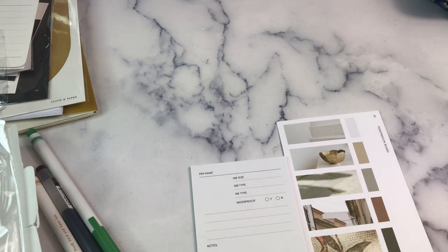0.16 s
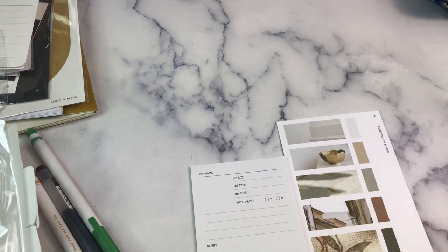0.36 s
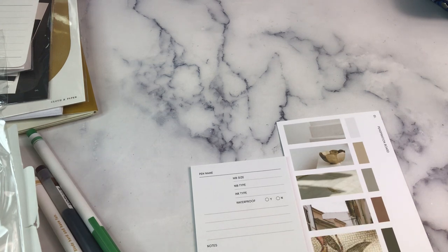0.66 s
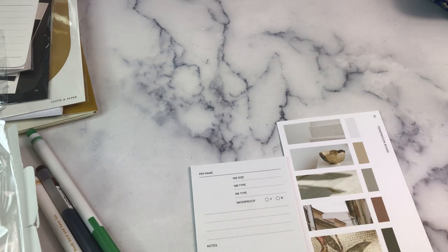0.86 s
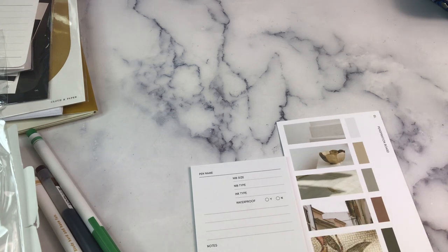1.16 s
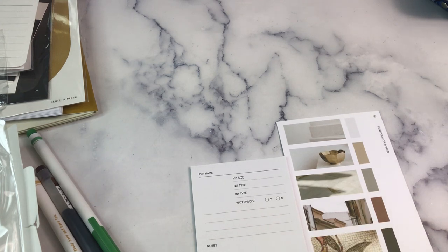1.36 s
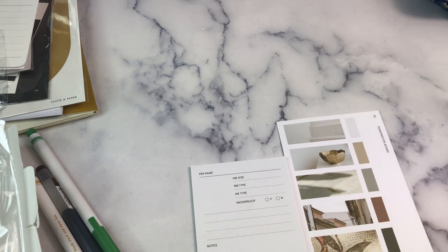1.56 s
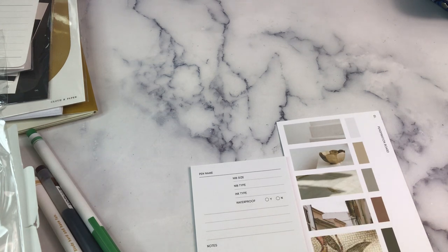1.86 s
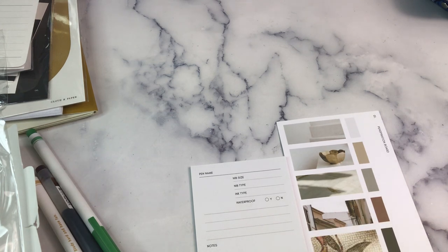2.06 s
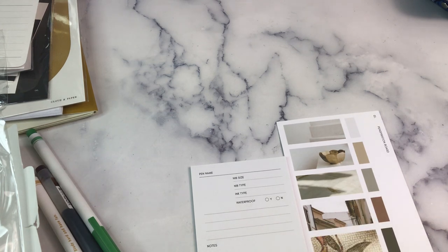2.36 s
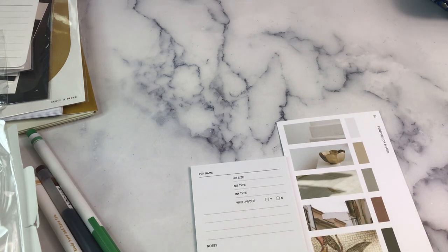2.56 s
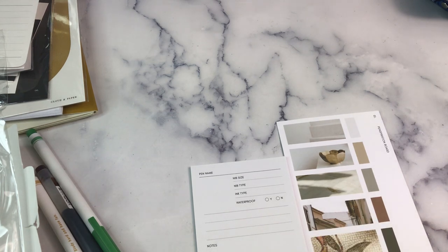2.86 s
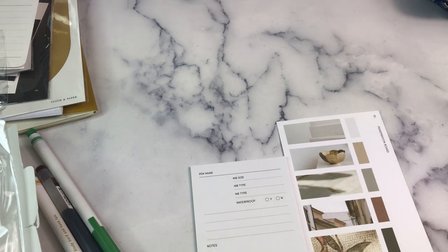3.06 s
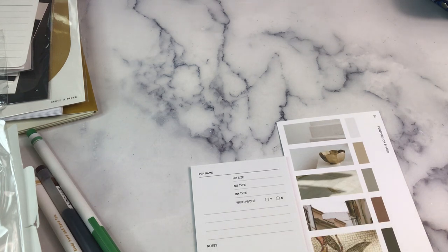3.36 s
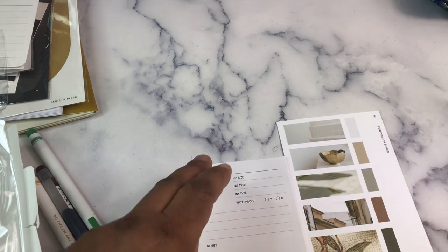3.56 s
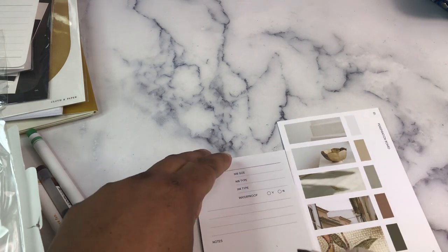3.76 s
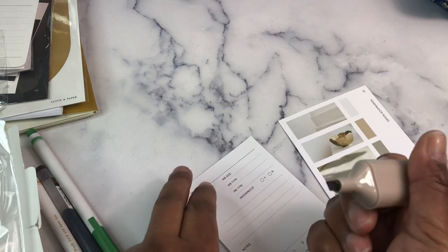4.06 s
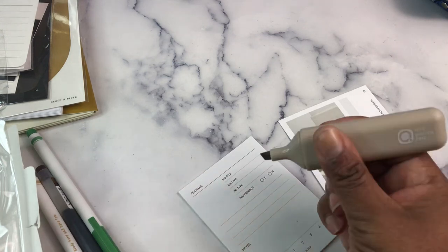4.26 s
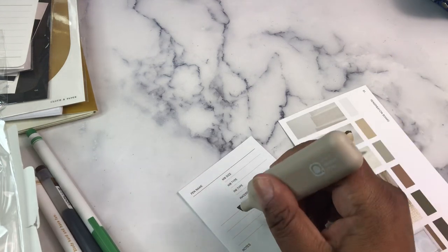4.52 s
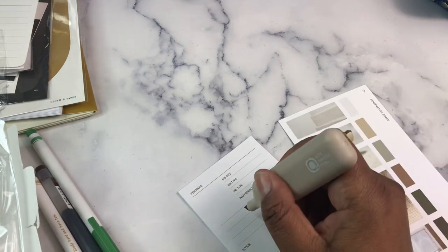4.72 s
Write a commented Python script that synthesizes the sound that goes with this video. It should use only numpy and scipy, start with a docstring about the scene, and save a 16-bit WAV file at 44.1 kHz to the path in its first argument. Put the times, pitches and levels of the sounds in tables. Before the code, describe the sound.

Close, dry sounds of shuffled sheets, small plastic creaks and a single loud cap snap, followed by faint rubbing of skin and paper.

```python
"""Paper slides over a table, made of hiss shaped into strokes, with soft hand bumps ringing table and sheet.
A plastic highlighter is then gripped close to the microphone: as its tight cap is worked loose, it ticks,
creaks and judders, each small slip ringing the plastic. The cap comes off with one sharp snap, a single blow.
Hands then brush across the table and turn a notepad: filtered noise for skin and paper, and one late tick.
Steady noise and short echoes of a small quiet room lie around it all."""
import sys
import numpy as np
from scipy import signal
from scipy.fft import rfft, irfft
from scipy.io import wavfile

SR = 44100
rng = np.random.default_rng(int(sys.argv[2]) if len(sys.argv) > 2 else 0)


def unload_audio(sound):
    """Save the sound as a 16-bit wav file, at the path given as the first command line argument."""
    columns = np.transpose(np.atleast_2d(sound))
    # keep every value between -1 and 1, then stretch to whole-number steps
    steps = np.round(np.clip(columns, -1, 1) * 32767)
    wavfile.write(sys.argv[1], SR, steps.astype(np.int16))


N = 215560
TIME = np.arange(N) / SR  # s

# Levels are relative: the functions add the balance between the parts.
# Each resonance filter is used twice, so its "width" is that of a single pass.

# the moment the cap comes off
SNAP_S = 2.7383
# ring of the freed cap and barrel: f/Hz, width/Hz, level/dB
CAP_RING = [(980, 240, -9), (1140, 130, -6), (1330, 180, -9), (1670, 240, -3), (1770, 130, 0),
            (1965, 110, -7), (2160, 200, -4), (2360, 180, -11), (2710, 280, -9), (3830, 300, -16),
            (4400, 350, -15), (5600, 700, -14), (6100, 600, -14)]
# sharp crack of the snap: f/Hz, width/Hz, level/dB
CRACK = [(1690, 1580, -1.5), (4170, 200, -4.5), (5900, 1200, -6.5), (9730, 2000, -8), (11660, 1400, -10.5),
         (15100, 1100, -17.5)]
# the hands jerk apart as the cap lets go: f/Hz, width/Hz, level/dB
RECOIL = [(84, 55, 0), (121, 90, -4.5), (270, 63, -8.5)]
# colour of the snap's echoes from things nearby: f/Hz, level/dB
SPLASH = [(200, -19), (700, 4), (1800, 6), (3200, -1.5), (6000, -3), (9000, -7), (16000, -15)]

# runs of slips: t/s, length/s, first rate/Hz, last rate/Hz, peak level/dB,
# place of the peak (0-1), extra rim level/dB, rim pitch ratio
CREAKS = [(0.91, 0.036, 229.7, 103, -50.5, 0.33, -8, 0.95),
          (1.029, 0.055, 208.5, 133.6, -50.5, 0.2, 0, 0.95),
          (2.018, 0.018, 230.5, 159, -49, 0.17, -2.5, 1.16),
          (2.2982, .057, 88.5, 354, -38, 0.4, -1.5, 0.67), (2.5479, 0.019, 216, 421, -39, 0.14, 2, 1.04)]
CREAK_FADE_DB = 17  # slips weaken on both sides of the peak: dB over the length of a run
CREAK_DULLING_DB = 1.5  # quick slips load the rim less and sound duller: dB per doubling of the rate
# the twisted cap judders, slowing down
JUDDER_S, JUDDER_LENGTH_S, JUDDER_FIRST_HZ, JUDDER_LAST_HZ = 2.1072, 0.156, 123, 70.4
# single slips of the cap on the barrel: t/s, level/dB, extra rim level/dB
TICKS = [(1.0952, -52.5, -4), (1.144, -54, -4), (1.1654, -54.5, 7), (1.188, -53, -5), (1.3419, -49, -2),
         (1.5304, -61, 11), (1.7368, -51.5, -10), (1.7636, -44, -6), (1.807, -49, -16), (1.8338, -42, -3),
         (1.8594, -58, 4), (1.879, -41.5, 3.5), (1.9193, -46.5, -7), (1.933, -45, -3), (1.9494, -49.5, -7),
         (1.9607, -41.5, 2.5), (2.001, -52, -7), (2.1237, -45.5, -12), (2.1532, -40.5, -11),
         (2.1865, -39, -7), (2.2177, -41.5, -4.5), (2.2387, -39.5, -4.5), (2.2823, -49, -10),
         (2.7071, -50.5, -9.5), (4.431, -48, -18)]
# fingers squeeze the plastic: t/s, length/s, level of the weakest tiny slips/dB
SQUEEZES = [(0.961, 0.15, -66), (1.12, .14, -66.5), (1.481, .27, -65.5), (1.75, .27, -67.5),
            (2.017, 0.11, -75), (2.36, .18, -71.5), (2.68, .055, -64.5)]
# resonances of the highlighter, before any detuning: f/Hz, width/Hz, level/dB
SHELL = [(1700, 650, 8), (2430, 230, -9.5), (2950, 1300, 9.5)]
GRIPPED_SHELL = [(1790, 690, 2), (2250, 1500, 1), (3230, 930, -11.5)]
TWISTED_SHELL = [(850, 620, 1.5), (1600, 450, 5.5), (2770, 690, 3)]
RIM = [(4300, 610, -4), (6500, 1700, 2.5), (7620, 5700, 7.5), (12900, 6800, -4)]
GRIPPED_RIM = [(4600, 960, -7.5), (6690, 1500, 0), (8150, 3500, 0.5), (13500, 10000, -10)]
HOLLOW_BARREL = [(850, 650, 0)]

# paper sliding at a steadily changing speed: t/s, length/s, first level/dB, last level/dB, extra treble level/dB
STROKES = [(0.026, 0.13, -52.5, -42, -4), (0.222, 0.057, -71, -68, -3), (0.403, 0.072, -69.5, -58.5, -3),
           (0.533, 0.062, -62.5, -56.5, -1), (0.637, 0.091, -61.5, -60.5, -1.5),
           (0.752, 0.052, -57.5, -51.5, 1.5), (0.846, 0.11, -66, -69, -5), (1.389, 0.085, -55, -64, -7),
           (3.166, 0.12, -65.5, -62, -1), (3.324, 0.11, -63.5, -58.5, -1.5),
           (3.47, 0.15, -64.5, -66.5, -5.5), (3.802, 0.18, -69.5, -64, -1),
           (4.159, 0.041, -62.5, -61.5, 1.5), (4.228, .14, -72.5, -69.5, -5.5)]
# colour of the paper hiss: f/Hz, level/dB
PAPER = [(200, -51), (600, -29), (900, -10), (1400, -16.5), (2400, -6.5), (3300, 0.5), (4400, 5),
         (6500, 2.5), (8000, -1), (11000, -8), (14000, -5), (16000, -22)]
# fingertips dragging on paper: t/s, length/s, f/Hz, level/dB
DRAGS = [(0.565, 0.022, 2060, -62), (1.39, 0.027, 3900, -55.5), (3.178, 0.032, 4140, -61),
         (3.273, 0.045, 3200, -59), (3.318, 0.017, 4100, -56), (3.45, 0.12, 4650, -65)]
# skin rubbing over pad and barrel: t/s, length/s, rub level/dB, level of the hand's rumbling weight/dB
RUBS = [(.01, 0.21, -70.5, -78), (0.24, 0.71, -82.5, -76.5), (1.195, 0.234, -87, -70.5),
        (1.625, 0.11, -79, -77), (3.282, 0.6, -71, -70.5), (3.843, 0.076, -66.5, -64),
        (3.935, 0.46, -71, -75), (4.444, 0.407, -73, -68.5)]
# colour of rubbing skin: f/Hz, level/dB
SKIN = [(40, -14.5), (120, -0.5), (280, 6.5), (600, -5), (1400, 0), (2400, 0), (4200, -0.5), (7000, -8),
        (15000, -17)]
# a hand slides on the bare table top: t/s, length/s, level/dB
SLIDES = [(.01, 0.078, -66), (3.326, 0.43, -75.5), (3.805, 1.0, -90)]
# resonances of the table top: f/Hz, width/Hz, level/dB
TABLE_TOP = [(1318, 460, -8.5), (1560, 660, -14)]
# the table under a moving hand: f/Hz, level/dB
RUMBLE = [(30, -22), (58, 3.5), (85, -5.5), (115, 2.5), (160, -15), (400, -33.5)]
# every slide gets going and dies away alike
ATTACK_S, RELEASE_S = 0.028, 0.013
# soft bumps of hand and paper on the table: t/s, thud level/dB, paper flick level/dB
BUMPS = [(0.017, -52.5, -55), (.173, -46.5, -31.5), (.462, -76, -60), (.473, -76, -49.5),
         (3.153, -79, -52.5), (3.318, -50, -59), (3.425, -58, -66), (3.853, -67, -62), (4.793, -61.5, -79)]
# low thud of the bumped table: f/Hz, width/Hz, level/dB
TABLE_THUD = [(76, 72, -3), (118, 110, 0), (287, 31, -4.5)]
# soft pat on the sheet: f/Hz, width/Hz, level/dB
PAT = [(430, 290, -25), (800, 740, 12), (1230, 390, 10), (2360, 1700, 10), (3800, 1800, -18)]
# flick of the edge of a sheet: f/Hz, width/Hz, level/dB
FLICK = [(4560, 3400, -4.5), (11400, 7000, -6.5)]

# colour of the reflections: f/Hz, level/dB
ROOM = [(80, -7.5), (400, -3.5), (1200, -5), (2050, 0.5), (3100, -3), (6000, -4), (10000, -5.5),
        (16000, -4.5)]
# colour of the steady room noise: f/Hz, level per Hz/dB
AIR = [(25, -24.5), (40, -3.5), (55, 1.5), (115, -2.5), (200, -7), (500, -14), (1000, -16.5), (2000, -22),
       (4000, -21), (7500, -26.5), (16000, -28.5)]
AIR_DB = -67.5  # overall level of the room noise
TOP_HZ = 16300  # upper end of the sound


def snap(crack_db=-12, ring_db=-20, recoil_db=-30, lag=0.67, passes=5):
    """The cap jumps its retaining bead: a crack, the ring of the freed cap and barrel, and the recoil of the hands."""
    jump = blows([SNAP_S], [0])
    plastic = undb(crack_db) * ring(jump, CRACK) + undb(ring_db) * ring(jump, CAP_RING)
    for _ in range(passes):  # bending waves: the highs outrun the lows
        plastic = signal.lfilter([-lag, 1], [1, -lag], plastic)
    return plastic + undb(recoil_db) * ring(jump, RECOIL)


def splash(db=-31, t60_s=0.2):
    """The snap spreads to all sides and comes back evenly mixed as early echoes."""
    jump = blows([SNAP_S], [0])
    echoes = signal.fftconvolve(jump, burst(0.003, t60_s))[:N]
    return undb(db) * np.sqrt(SR / 1000) * colour(echoes, SPLASH)


def creaks(shell_db=-1, hollow_db=-18, scatter_db=1.8):
    """Stick and slip: the cap lets go again and again, at a rate that follows the pull; the grip tunes the rim."""
    out = 0
    for start, length, first_hz, last_hz, peak_db, peak_at, rim_db, pitch in CREAKS:
        s = slips(length, first_hz, last_hz)
        fade_db = CREAK_FADE_DB * np.abs(s / length - peak_at)
        db = peak_db - fade_db + scatter_db * rng.standard_normal(SR)[:len(s)]
        speed_up = np.interp(s, [0, length], [1, last_hz / first_hz])
        dull_db = CREAK_DULLING_DB * np.log2(speed_up)
        out = out + strike(start + s, db + shell_db, GRIPPED_SHELL, detune=0.022)
        out = out + strike(start + s, db + hollow_db, HOLLOW_BARREL, detune=0.1)
        out = out + strike(start + s, db + rim_db - dull_db, GRIPPED_RIM, pitch, detune=0.07)
    return out


def judder(peak_db=-47, fade_db=9, peak_at=0.76, scatter_db=2):
    """The twisted cap moves in dull, slowing steps that swell and ease off."""
    s = slips(JUDDER_LENGTH_S, JUDDER_FIRST_HZ, JUDDER_LAST_HZ)
    from_peak = np.abs(s / JUDDER_LENGTH_S - peak_at)
    db = peak_db - fade_db * from_peak + scatter_db * rng.standard_normal(SR)[:len(s)]
    return strike(JUDDER_S + s, db, TWISTED_SHELL, detune=0.065)


def ticks(shell_db=-1, rim_db=-1, hollow_db=-15):
    """Each slip of the cap rings the shell, the stiff rim and the hollow barrel."""
    s, db, extra_rim_db = np.transpose(TICKS)
    shell = strike(s, db + shell_db, SHELL, detune=0.13)
    rim = strike(s, db + extra_rim_db + rim_db, RIM, detune=0.12)
    hollow = strike(s, db + hollow_db, HOLLOW_BARREL, detune=0.17)
    return shell + rim + hollow


def grip(spread_db=4, rim_db=-7, count=12):
    """Each squeeze makes tiny slips at random moments, ringing the shell and the rim."""
    push = 0
    for start, length, db in SQUEEZES:
        when, size = rng.random((count, 2)).T
        times = start + length * (np.arange(count) + when) / count  # one in each equal share of the squeeze
        stronger_db = spread_db * np.minimum(-np.log(size), 2)
        push = push + blows(times, db + stronger_db)
    return ring(push, GRIPPED_SHELL) + undb(rim_db) * ring(push, RIM)


def paper(hiss_db=-1):
    """Sheets slide in strokes, each with its own speed and brightness."""
    friction = fibres(grain_db=2, flutter_db=1.87)
    hiss = colour(shifting(friction, patchy_db=3, rate=40), PAPER)
    body = undb(hiss_db) * band(hiss, 330, 8000) / np.std(band(hiss, 3400, 9100))
    treble = unit(band(hiss, 9500, 18000))
    out = 0
    for s, length, first_db, last_db, treble_db in STROKES:
        out = out + movement(s, length, first_db, last_db) * (body + undb(treble_db) * treble)
    return out


def drags(trim_db=-1, width=0.26):
    """A dragging fingertip makes the sheet sing briefly around one pitch."""
    friction = fibres(grain_db=5, flutter_db=8)
    out = 0
    for s, length, hz, db in DRAGS:
        swell = np.exp(-(2 * (TIME - s) / length) ** 2)
        out = out + undb(db + trim_db) * swell * unit(ring(friction, [(hz, width * hz, 0)]))
    return out


def hands():
    """Skin rubs over pad and barrel; the table top hums under a sliding hand and rumbles under its weight."""
    rub = sum(movement(s, length, db, db) for s, length, db, _ in RUBS)
    weight = sum(movement(s, length, db, db) for s, length, _, db in RUBS)
    slide = sum(movement(s, length, db, db) for s, length, db in SLIDES)
    friction = fibres(grain_db=2.5, flutter_db=2.5)
    skin = colour(friction, SKIN)
    skin = skin / np.std(band(skin, 700, 2730))
    hum = unit(ring(friction, TABLE_TOP))
    rumble = unit(colour(rng.standard_normal(N), RUMBLE))
    return rub * skin + slide * hum + weight * rumble


def bumps(thud_db=4, pat_db=6.5, flick_db=2):
    """Soft contacts push for a few milliseconds: the table thuds and the sheet flicks."""
    s, thud, flick = np.transpose(BUMPS)
    thuds = ring(blows(s, thud + thud_db), TABLE_THUD)
    sheet = ring(blows(s, thud + pat_db), PAT) + ring(blows(s, flick + flick_db), FLICK)
    return thuds + signal.fftconvolve(sheet, burst(0.00098, 0.01))[:N]


def table(x, near_db, mirror_db, mirror_s=0.0051):
    """The table top mirrors a sound, and the hands and things on it scatter it."""
    mirrored = undb(mirror_db) * np.interp(TIME - mirror_s, TIME, x, left=0)
    scattered = undb(near_db) * signal.fftconvolve(x, burst(0.0023, 0.035))[:N]
    return x + colour(mirrored + scattered, ROOM)


def walls(x, tail_db=-19):
    """The small room adds a short tail of echoes."""
    tail = signal.fftconvolve(x, burst(0.008, 0.25))[:N]
    return x + undb(tail_db) * colour(tail, ROOM)


def air():
    """Quiet, steady room noise with a low rumble: random noise given a fixed colour."""
    return undb(AIR_DB) * unit(colour(rng.standard_normal(N), AIR))


def slips(length, first_hz, last_hz):
    """Times of stick and slip at a gliding rate."""
    times = [0.0]
    while times[-1] < length:
        rate = np.interp(times[-1], [0, length], [first_hz, last_hz])
        times.append(times[-1] + 1 / rate)
    return np.array(times[:-1])


def strike(times, db, modes, pitch=1, detune=0):
    """Separate slips; the fingers load the plastic a little differently each time, which shifts its pitch."""
    out = np.zeros(N + SR)
    chances = rng.uniform(-0.8, 1, SR)  # more than enough: one is used for each slip
    for s, gain, chance in zip(times, undb(db), chances):
        click = gain * response(modes, pitch * np.exp(detune * chance))
        i = int(s * SR)
        out[i:i + len(click)] += click
    return out[:N]


def response(modes, pitch=1):
    """A blow on steep resonances, with the energy of a millisecond at full scale."""
    blow = signal.unit_impulse(SR // 10) + 1e-18  # the tiny offset avoids slow, vanishingly small numbers
    out = 0
    for hz, width, db in modes:
        b, a = signal.iirpeak(min(hz * pitch, SR / 2 - 1), hz / width, SR)
        once = signal.lfilter(b, a, blow)
        out = out + undb(db) * signal.lfilter(b, a, once)
    return out * np.sqrt(SR / 1000 / np.sum(out ** 2))


def ring(x, modes):
    """Drive resonances with a force."""
    return signal.fftconvolve(x, response(modes))[:N]


def blows(times, db):
    """One impulse for each contact."""
    return np.bincount((np.asarray(times) * SR).astype(int), undb(db), N)[:N]


def burst(rise_s, t60_s):
    """Dense random contacts or echoes that swell and die away, with unit energy."""
    t = TIME[:SR // 2]
    swell = 1 - np.exp(-(t / rise_s) ** 2)
    decay = np.exp(-np.log(1000) * t / t60_s)  # down 60 dB after t60_s
    x = rng.standard_normal(len(t)) * swell * decay
    return x / np.sqrt(np.sum(x ** 2))


def fibres(grain_db, flutter_db):
    """Friction: countless tiny catches of uneven size under a wavering pressure."""
    catches = rng.standard_normal(N)
    uneven_db = grain_db * walk(2500) + flutter_db * walk(70)
    return unit(catches * undb(uneven_db))


def shifting(x, patchy_db, rate, count=14):
    """Neighbouring bands swell and sink on their own as the contact wanders."""
    spectrum = rfft(x)
    bins = np.fft.rfftfreq(N, 1 / SR) + 1
    place = np.interp(np.log(bins), np.log([1500, 16000]), [0, count - 1])
    out = 0
    for k in range(count):
        share = np.maximum(1 - np.abs(place - k), 0)  # overlapping triangles
        out = out + irfft(spectrum * share, N) * undb(patchy_db * walk(rate))
    return unit(out)


def movement(start, length, first_db, last_db):
    """Gain of one slide: a quick rise that is complete at the start, a steady change of level, a short run-out."""
    since = TIME - start
    attack = np.clip(1 + since / ATTACK_S, 0, 1)
    release = np.exp(-np.maximum(since - length, 0) / RELEASE_S)
    return attack * release * undb(np.interp(since, [0, length], [first_db, last_db]))


def walk(rate):
    """Random points, `rate` per second, joined by straight lines; the spread is near 1."""
    points = rng.standard_normal(N)
    return np.interp(TIME * rate, np.arange(N), points)


def colour(x, spectrum):
    """Make some pitches louder than others, following (Hz, dB) points."""
    hz, db = np.transpose(spectrum)
    bins = np.maximum(np.fft.rfftfreq(len(x), 1 / SR), 1)
    gain = undb(np.interp(np.log(bins), np.log(hz), db))
    return irfft(rfft(x) * gain, len(x))


def band(x, lo_hz, hi_hz):
    """Keep one band."""
    sos = signal.butter(3, [lo_hz, min(hi_hz, SR / 2 - 1)], "band", fs=SR, output="sos")
    return signal.sosfilt(sos, x)


def unit(x):
    """Scale to a spread (standard deviation) of 1."""
    return x / np.std(x)


def undb(db):
    """Decibels to gain."""
    return 10 ** (np.asarray(db) / 20)


def scene():
    """Everything happens just above the table, close to one microphone; the closed hands scatter the creaking most."""
    rustle = table(paper() + drags() + hands() + bumps(), near_db=-10, mirror_db=-16.5)
    loosening = table(grip() + ticks() + judder() + creaks(), near_db=-3.5, mirror_db=-15.5)
    pop = table(snap(), near_db=-8, mirror_db=-20) + splash()
    return (walls(rustle + loosening + pop) + air())[None]  # one channel


def record(dry):
    """A steep filter cuts the very highest treble."""
    sos = signal.ellip(10, 0.2, 80, TOP_HZ, fs=SR, output="sos")
    return signal.sosfilt(sos, dry)


dry = scene()
out = record(dry)
unload_audio(out)
```